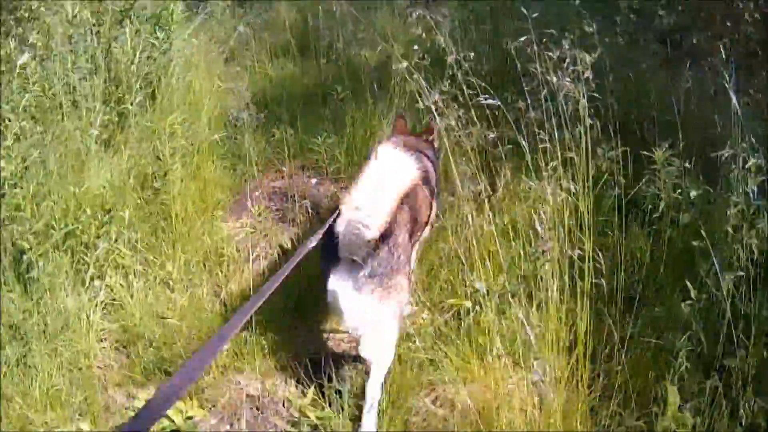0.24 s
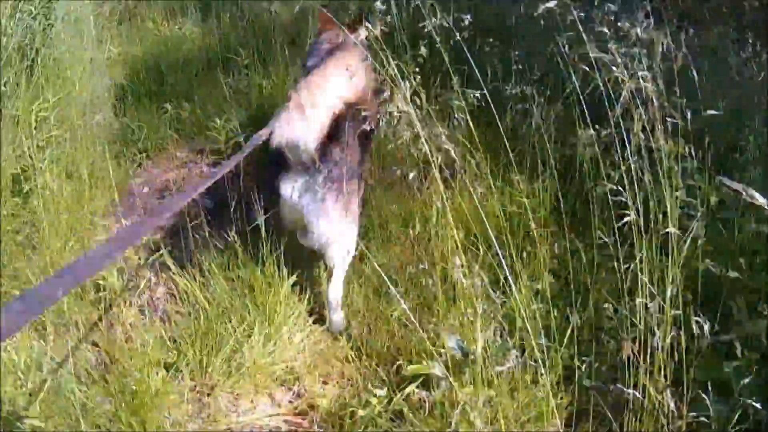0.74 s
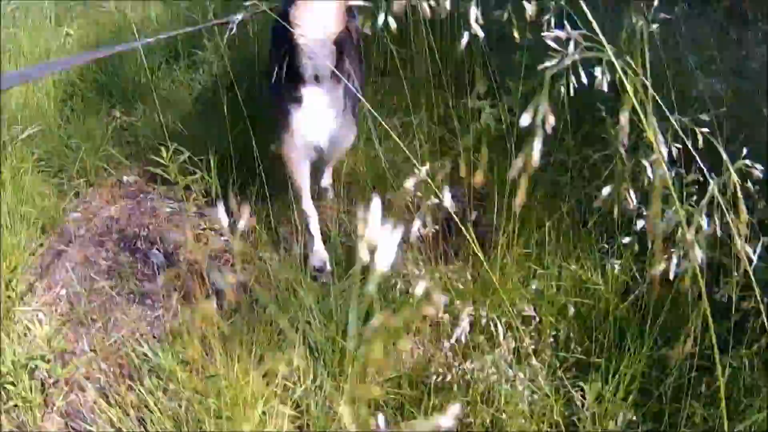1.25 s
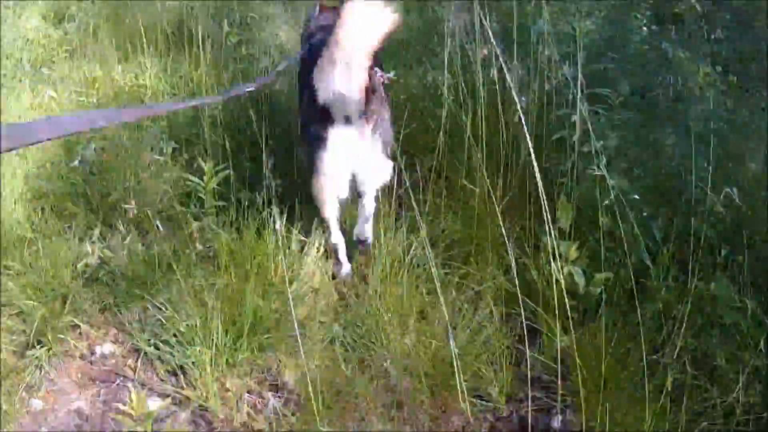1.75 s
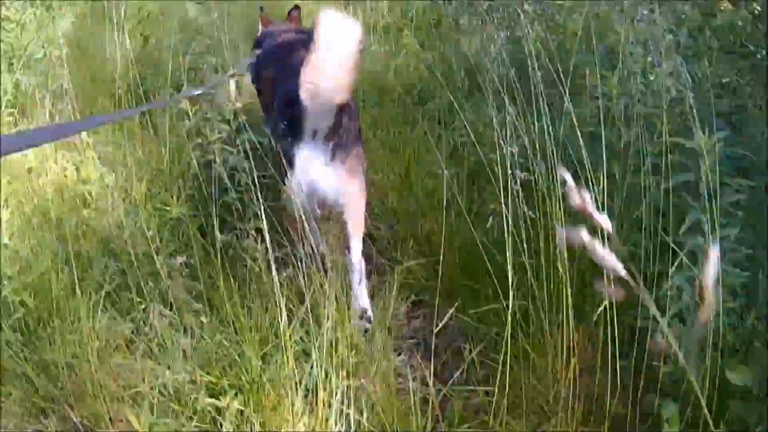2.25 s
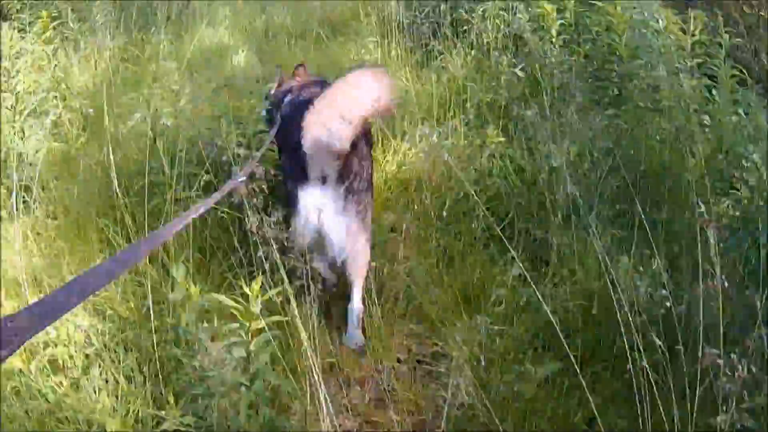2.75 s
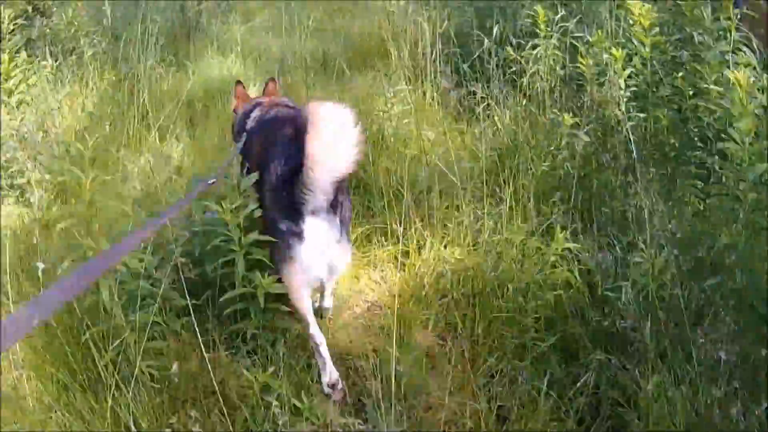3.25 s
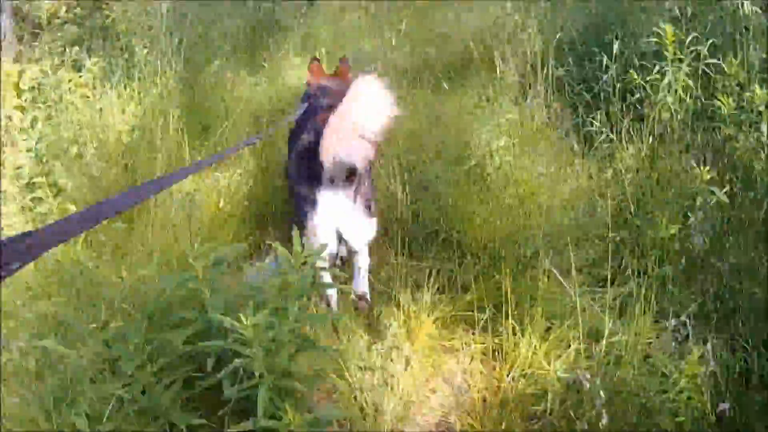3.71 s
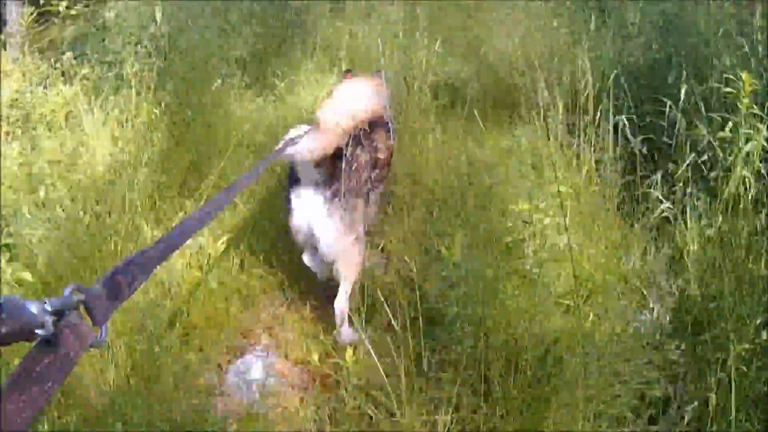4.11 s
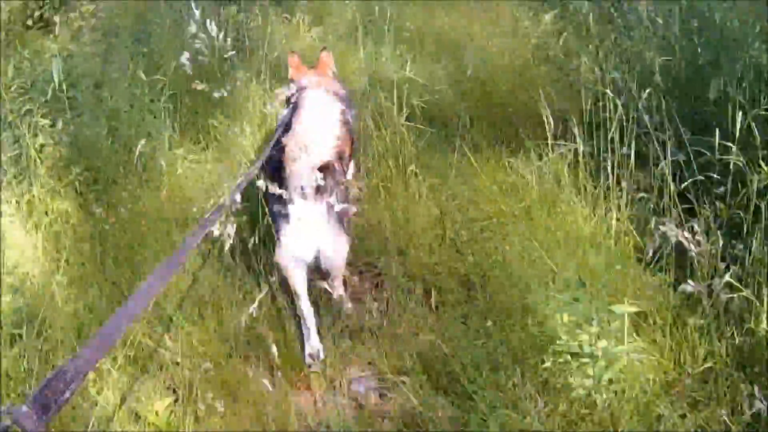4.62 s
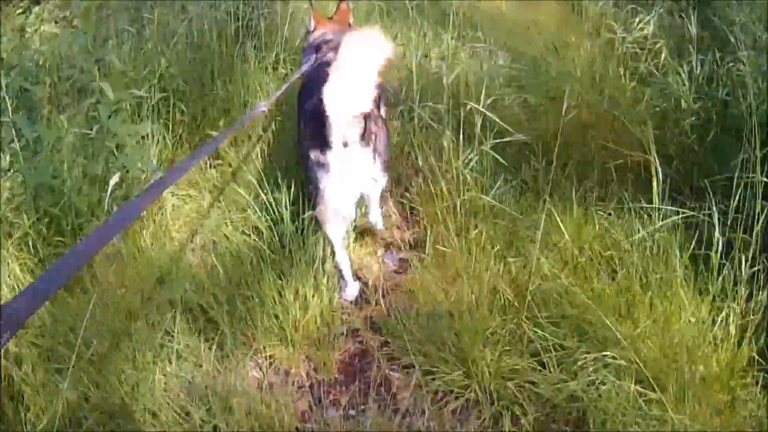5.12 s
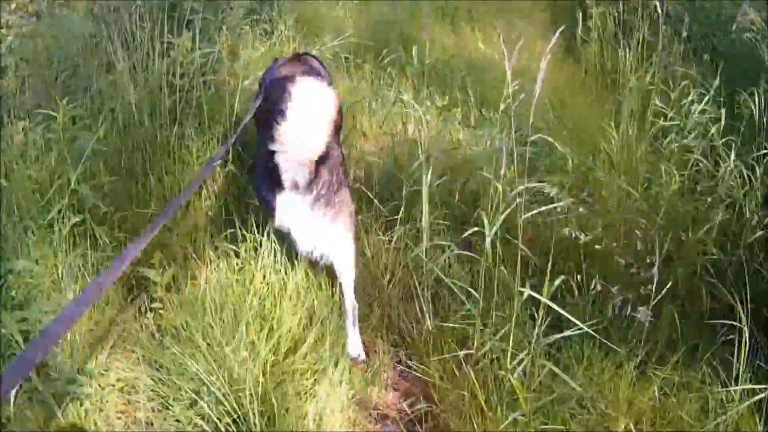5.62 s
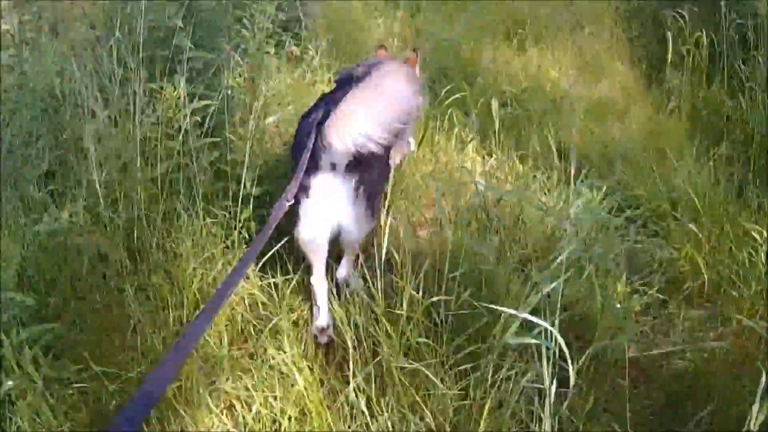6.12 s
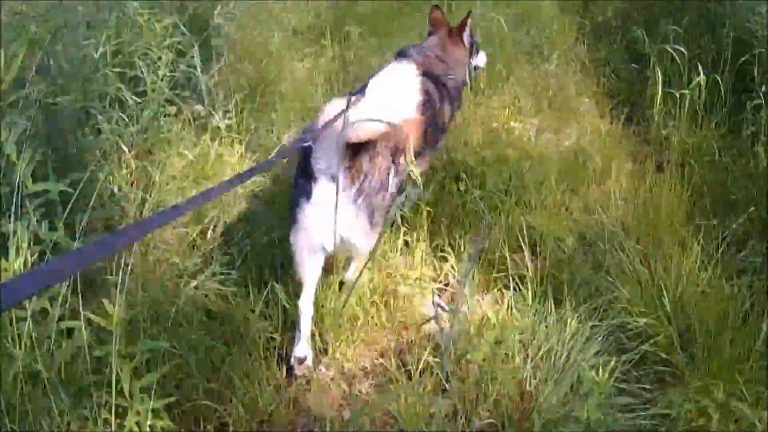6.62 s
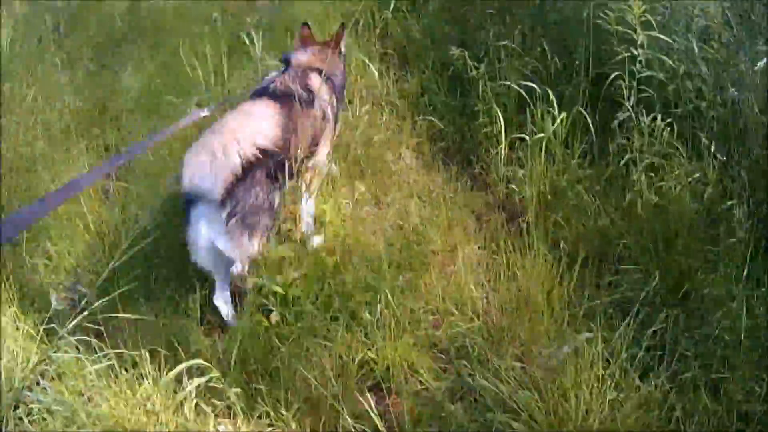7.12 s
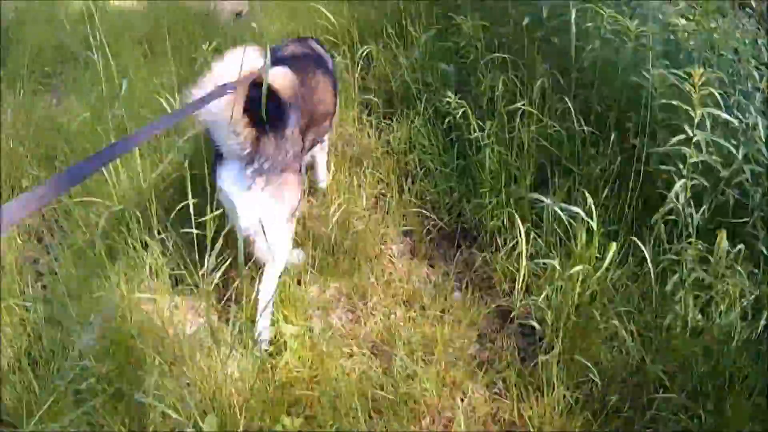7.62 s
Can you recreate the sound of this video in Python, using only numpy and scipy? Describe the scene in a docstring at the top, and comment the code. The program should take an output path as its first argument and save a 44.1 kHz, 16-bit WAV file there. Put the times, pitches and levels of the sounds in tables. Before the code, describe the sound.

A close, muffled camera microphone moves through tall grass behind a leashed dog. Uneven swishes swell and fade, full of tiny crackles, with stalks flicking in short, dull, woody clicks throughout. Soft low steps bump irregularly underneath. Midway a dry stem scrapes briefly and stops dead; near the end a low handling rumble jumps up. Faint hiss and a thin buzzing high whine stay in the background.

```python
"""A walk behind a dog through tall grass, heard by the muffled microphone of a small camera.
From the start, grass swishes past in tiny slips that ring the blades, over a low noise of the swaying
camera and its electronics: faint hiss and a whine that buzzes because its phase keeps slipping back.
Soon stalks snap in short clicks and steps bump as damped low tones; then blades slide by in grainy hiss.
Midway a dry stem scrapes in dense slips that grow and stop dead; near the end the sway rumbles louder."""
import sys
import numpy as np
from scipy import signal
from scipy.io import wavfile
from scipy.ndimage import uniform_filter1d

SR = 44100
rng = np.random.default_rng(int(sys.argv[2]) if len(sys.argv) > 2 else 0)


def wrap_up_sound(samples):
    """Save the sound to the file named by the first command line argument, as 16-bit audio."""
    columns = np.atleast_2d(samples).T
    # keep every value between -1 and 1, then stretch to whole-number steps
    tamed = np.clip(columns, -1, 1)
    steps = np.round(tamed * 32767).astype(np.int16)
    wavfile.write(sys.argv[1], SR, steps)


N = 346626
TIME = np.arange(N) / SR  # seconds

# In all colour tables below only the shape counts: the filter is scaled to unit energy.
# tufts of grass sweeping past legs and camera: [peak t/s, length/s, level/dB, brightness/(dB per octave)]
SWISH_EVENTS = [(0.006, 0.79, -42.5, 1), (0.323, 0.087, -45, -0.5), (0.838, 1, -47, 0),
                (0.873, 0.22, -40, 1.5), (1.013, 0.06, -43.5, 3.5), (1.228, 0.09, -46, 0.5),
                (1.416, 0.13, -46.5, 1.5), (1.631, 0.34, -44.5, 0.2), (1.633, 0.06, -46, 2),
                (1.836, 0.15, -47.5, 2.2), (2.034, 0.2, -42.5, 1.5), (2.234, 0.18, -43.5, 1.5),
                (2.691, 0.32, -42, 1.6), (2.872, 0.27, -44.6, 0.5), (3.09, 0.023, -51.5, 3),
                (3.192, 0.56, -49, 1.1), (3.261, 0.033, -44.5, 4.5), (3.555, 0.41, -46, 0.6),
                (3.846, 0.063, -42, 1), (4.029, 0.035, -43, 5.5), (4.05, 1, -48.5, 0.5),
                (4.379, 0.12, -45, 0.3), (4.565, 0.051, -39, 2), (4.625, 0.65, -43.0, 0.5),
                (5.097, 0.27, -48, 1.2), (5.347, 0.23, -42, 1.5), (5.567, 0.12, -48, 2),
                (5.733, 0.21, -47, 4), (5.983, 0.57, -50.5, 3), (5.983, 0.061, -41, 1),
                (6.15, 0.18, -52, 0.5), (6.389, 0.21, -47, 2), (6.485, 0.053, -40.5, 2.5),
                (6.574, 0.4, -48, -1.4), (6.915, 0.015, -42, 2.5), (7.055, 0.42, -43.5, 0.9),
                (7.224, 0.18, -47, 1), (7.644, 0.04, -44, 2), (7.645, 0.5, -48.5, 2),
                (7.87, 0.16, -47.5, 0.5)]
# a swish swells while the blades bend and dies away, duller, once they spring free
RISE_SHARE, SWISH_CURVE = 0.59, 1.27  # share of the length spent rising; bend of the fade in dB
ENDS_DB, DULLING_DB_PER_OCT = -12, 0.5  # level at both ends; loss of brightness from peak to end
# between swishes the grass underfoot keeps stirring, low and dull
STIR_DB, STIR_DB_PER_OCT = -55, -4.5
# colour of the rustle through the muffled microphone: [f/Hz, level/dB]
RUSTLE_COLOUR = [(25, -52), (65, -46.5), (140, -27.5), (250, -21), (480, -11), (680, -5.5), (880, 0),
                 (1300, -1), (1650, -11.5), (2000, -22.5), (2400, -36.5), (3100, -50.5), (5000, -72)]
# colour of the crisp edge on the rustle: [f/Hz, level/dB]
EDGE_COLOUR = [(900, -29.5), (2000, 8.5), (2600, 4), (3100, -7.5), (3650, 2.5), (4000, -10), (4500, -9.5),
               (5100, -34), (15000, -46)]
# crisp treble of the rustle at average effort: [t/s, level/dB]
TREBLE_LEVEL = [(0, -74.5), (.25, -86), (.55, -76.5), (.8, -83.5), (1.05, -88), (1.65, -81.5), (2.0, -87),
                (3.0, -81), (4.4, -85.5), (4.9, -82.5), (5.75, -90.5), (6.4, -83.5), (6.95, -83.5),
                (7.3, -84.5), (7.85, -86)]
# low rumble of the camera swaying in the hand: [t/s, level/dB]
SWAY_LEVEL = [(0, -92.5), (1.25, -81), (1.4, -93), (5, -94), (6, -89.5), (7.5, -90.5), (7.57, -72),
              (7.65, -81), (7.85, -87)]
# colour of that rumble: [f/Hz, level/dB]
RUMBLE_COLOUR = [(25, -12.5), (65, 0.5), (130, -2), (1000, -80)]
# colour of the microphone hiss: [f/Hz, level/dB]
HISS_COLOUR = [(30, 8), (300, 18), (3000, 10.5), (6000, -5), (9000, 0.5), (15000, -2.5)]
HISS_DB, WHINE_DB = -85, -86  # rms, before the camera limits the treble
WHINE_HZ, WHINE_SLIPS_PER_S = 10497.3, 89.3  # average pitch; how often the phase slips back
CUTOFF_HZ = 15720  # the camera's upper limit
# stalks that flick against legs and camera; a small shared trim is added to both levels:
# [strongest t/s, peak level/dB, centre f/Hz, crisp edge level/dB relative to the peak]
SNAP_EVENTS = [(0.3142, -35, 1270, -41), (0.4237, -35.5, 950, -43), (0.4499, -28, 970, -47),
               (0.695, -34, 1000, -40), (0.869, -24, 1200, -44), (0.876, -41, 1080, -48),
               (0.8822, -34, 1150.0, -39), (1.0122, -31.5, 990.0, -40), (1.0937, -27, 1240, -24.5),
               (1.215, -31.5, 1100, -36), (1.227, -29, 1110, -37), (1.2327, -31, 1090, -44.5),
               (1.2547, -27, 1100, -43), (1.4433, -34.5, 1050, -33), (1.5412, -32, 1120.0, -41),
               (1.6129, -26, 1020.0, -45.5), (1.635, -28, 890, -44), (1.832, -42, 1260, -17),
               (2.0142, -30, 1170, -46.5), (2.023, -26, 1110, -41), (2.04, -25, 1130, -36),
               (2.074, -30, 1110, -36), (2.224, -30, 1120, -38), (2.296, -28.5, 1140, -26.5),
               (2.8515, -30, 950.0, -39), (2.896, -28, 980, -39.5), (2.953, -32.5, 1040, -42.5),
               (2.9689, -29, 1120, -31), (3.099, -32, 1100, -46), (3.2455, -29.5, 1150.0, -49.5),
               (3.261, -29.5, 1180, -41), (3.271, -26.5, 915, -33), (3.409, -34, 1100, -48),
               (3.449, -37, 1110, -37), (3.4773, -23.5, 995, -42), (3.5753, -26, 890, -48),
               (3.8673, -29.5, 1150, -36), (4.0305, -24.5, 1020, -53.5), (4.1186, -31.5, 1110, -55),
               (4.5172, -25.5, 1000.0, -48), (4.6136, -23, 990, -59), (4.9135, -33, 1130, -22),
               (5.05, -34.5, 1080, -29), (5.142, -35, 1130, -43), (5.3174, -26.5, 984, -29),
               (5.348, -25, 985, -41), (5.52, -42, 1210, -18), (5.548, -33, 1200, -44),
               (5.803, -34.5, 1200, -33), (5.8853, -26, 873, -48), (5.9772, -35, 1030.0, -43),
               (6.0549, -31, 960, -54), (6.127, -34.5, 980, -42), (6.4817, -30, 1120.0, -42),
               (6.498, -27, 1130, -37), (6.504, -38, 1190, -26), (6.5491, -28, 1180, -42),
               (6.9042, -26.5, 1204, -25), (7.086, -30.5, 1240, -40.5), (7.2199, -28.5, 970, -49),
               (7.4472, -35.5, 990, -39), (7.583, -33.5, 1055, -37), (7.636, -28, 1060, -44),
               (7.7218, -28, 990, -48)]
# colour of a single flick, before its pitch is shifted: [f/Hz, level/dB]
FLICK_COLOUR = [(30, -56.5), (140, -37), (400, -18.5), (800, 2.5), (1100, 8), (1400, -2.5), (1800, -18.5),
                (2400, -34.5), (4000, -72.5)]
# colour of the crack of a dry stalk: [f/Hz, level/dB]
CRACK_COLOUR = [(700, -12.5), (1800, 5.5), (2400, 9), (3100, -1), (3850, -2), (4300, -18), (5200, -40.5)]
# soft bumps of steps, before a shared level trim: [strongest t/s, peak level/dB, centre f/Hz]
BUMP_EVENTS = [(0.354, -67, 141), (0.452, -53, 350), (0.877, -57.5, 192), (1.013, -42, 520.0),
               (1.543, -48, 360.0), (1.688, -51.5, 288), (2.319, -44, 400.0), (2.57, -67, 142),
               (2.885, -41, 490.0), (2.953, -46, 386), (3.573, -43, 442), (4.808, -41.5, 537),
               (5.407, -43.5, 438), (5.884, -45, 540.0), (5.957, -49.5, 380.0), (6.056, -45.5, 453),
               (6.475, -39.5, 500), (7.279, -44, 504), (7.718, -68, 142)]
# long blades sliding past with a thin hiss: [start t/s, end t/s, level at mid-slide/dB]
SLIDE_EVENTS = [(.72, .95, -95), (2.584, 3.0, -97), (6.88, 7.198, -89)]
# colour of the sliding hiss: [f/Hz, level/dB]
SHEEN_COLOUR = [(2500, -8), (3600, 1.5), (4500, 5.5), (5100, -23), (7500, -21.5), (8400, -1), (10000, -14)]
# a dry stem scrapes along, harder and harder, and slips off
SCRAPE_FROM_S, SCRAPE_TO_S, SCRAPE_DB = 3.495, 3.577, -69


def amp(db):
    """Turns decibels into a gain."""
    return 10 ** (np.asarray(db) / 20)


def unit(x):
    """Scales a sound to an rms of one."""
    return x / np.sqrt(np.mean(x ** 2) + 1e-20)


def peaked(x):
    """Scales a sound to an envelope peak of one."""
    return x / abs(signal.hilbert(x)).max()


def steadied(x, size=2205):
    """Keeps the fine grain of a sound and evens out its slow level."""
    power = uniform_filter1d(uniform_filter1d(x ** 2, size), size)
    return x / np.sqrt(abs(power) + 1e-9)


def curve(rows):
    """Joins points by straight lines in time."""
    return np.interp(TIME, *np.transpose(rows))


def wander(size):
    """Makes smooth chance of unit rms that changes over about this many samples."""
    return unit(uniform_filter1d(uniform_filter1d(rng.standard_normal(N), size), size))


def add(mix, s, sound):
    """Mixes a sound in with its strongest moment at time s."""
    start = max(round(s * SR) - np.argmax(abs(signal.hilbert(sound))), 0)
    part = mix[start:start + len(sound)]
    part += sound[:len(part)]


def ping(spectrum, shift=1, size=4096):
    """Makes a short unit-energy ring with this spectrum, shifted in pitch by a factor."""
    hz, db = np.transpose(spectrum)
    f = abs(np.fft.fftfreq(size, 1 / SR))
    log_gain = np.log(amp(np.interp(np.log(f + 1), np.log(hz * shift), db)))
    # this phase puts the energy as early as possible, with nothing before the strike
    ring = np.fft.ifft(np.exp(np.conj(signal.hilbert(log_gain)))).real[:size // 2]
    return ring / np.linalg.norm(ring)


def colour(x, spectrum, shift=1):
    """Filters a sound by a spectrum."""
    return signal.oaconvolve(x, ping(spectrum, shift))[:N]


def slips(per_s, spread_db, largest):
    """Makes random tiny impulses, many small and a few large, together at unit rms."""
    size = amp(spread_db * np.minimum(rng.exponential(1, N), largest))
    happens = rng.random(N) < per_s / SR
    return unit(size * rng.choice([-1, 1], N) * happens)


def swishing(size=64):
    """Adds the power of all swishes; brightness is averaged by power, so the loudest counts most."""
    t = TIME[::size]
    power = np.full(len(t), amp(STIR_DB) ** 2)
    bright = power * STIR_DB_PER_OCT
    for s, length, db, brightness in SWISH_EVENTS:
        # progress is -1 at the start, 0 at the peak and 1 at the end; the fade carries on beyond
        progress = (t - s) / length / np.where(t < s, RISE_SHARE, 1 - RISE_SHARE)
        swish = amp(db + ENDS_DB * abs(progress) ** SWISH_CURVE) ** 2
        power = power + swish
        bright = bright + swish * (brightness - DULLING_DB_PER_OCT * progress)
    level_db = np.interp(TIME, t, 10 * np.log10(power))
    return level_db, np.interp(TIME, t, bright / power)


def blades(ticks, lowest_hz=260, highest_hz=2500, sharpness=2.64, level_db=5, count=14):
    """Each slip rings one blade for two or three cycles: long blades low, short ones high."""
    blade = rng.integers(0, count, N)
    ringing = np.zeros(N)
    for k, hz in enumerate(np.geomspace(lowest_hz, highest_hz, count)):
        ringing += signal.lfilter(*signal.iirpeak(hz, sharpness, fs=SR), ticks * (blade == k))
    return amp(level_db) * ringing


def rustle(rub_db=-2, merge=0.15, clump_db=2.0, pivot_hz=1000, crackle_db=1, fizz_db=-3,
           crisp_follow=0.77, uneven_db=0.69, colour_wander_db=0.5):
    """Blades slip in clumps over a smooth rub, each swish with its own brightness."""
    level_db, brightness = swishing()
    noise = rng.standard_normal(N)
    clumps = amp(clump_db * unit(uniform_filter1d(uniform_filter1d(noise, size=260), size=160)))
    ticks = slips(per_s=1500, spread_db=4.5, largest=2.53) * clumps
    # in a brisk stroke the slips merge, so the smooth rub gains on them
    briskness_db = level_db - level_db.mean()
    rub = amp(rub_db + merge * briskness_db) * rng.standard_normal(N) * clumps
    body = colour(rub + blades(ticks), RUSTLE_COLOUR)
    # brightness tips the spectrum about its middle and wanders a little
    hz, t, z = signal.stft(body, SR, nperseg=512)
    octaves = np.clip(np.log2((hz + 1) / pivot_hz), -1.4, 1)[:, None]
    tilt = brightness + colour_wander_db * wander(size=1300)
    z = z * amp(octaves * np.interp(t, TIME, tilt))
    body = signal.istft(z, SR, nperseg=512)[1][:N]
    # the same slips, at random strengths, carry a crisp edge with crackle and fizz of dry seed heads
    crackle = slips(per_s=260, spread_db=4.0, largest=4.6)
    fizz = rng.standard_normal(N)
    crisp = ticks * rng.standard_normal(N) + amp(crackle_db) * crackle + amp(fizz_db) * fizz
    edge_gain = amp(curve(TREBLE_LEVEL) + crisp_follow * briskness_db)
    edge = steadied(colour(crisp, EDGE_COLOUR)) * edge_gain
    return steadied(body) * amp(level_db + uneven_db * wander(size=900)) + edge


def sway():
    """The hand that holds the camera makes a low rumble: noise with a low colour."""
    return amp(curve(SWAY_LEVEL)) * unit(colour(rng.standard_normal(N), RUMBLE_COLOUR))


def electronics(phase_slip=.46):
    """Hiss, and a high whine whose phase slips back at a steady rate, which makes it buzz."""
    # counted in cycles: the phase creeps ahead, then drops back by phase_slip
    creep = phase_slip * (TIME * WHINE_SLIPS_PER_S % 1)
    whine = np.sin(2 * np.pi * (WHINE_HZ * TIME + creep))
    hiss = colour(rng.standard_normal(N), HISS_COLOUR)
    return amp(WHINE_DB) * unit(whine) + amp(HISS_DB) * unit(hiss)


def snaps(level_db=-0.2, edge_db=2, centre_hz=1050, rebound=0.38, rebound_s=0.00242):
    """A stalk strikes with a click of two or three cycles, and touches again a moment later."""
    out = np.zeros(N)
    chances = rng.random((len(SNAP_EVENTS), 3))
    for (s, db, hz, crisp_db), (lag, force, side) in zip(SNAP_EVENTS, chances):
        flick = peaked(ping(FLICK_COLOUR, hz / centre_hz))
        crack = amp(crisp_db + edge_db) * peaked(ping(CRACK_COLOUR))
        click = (flick + crack) * amp(db + level_db) * np.sign(side - .5)
        add(out, s, click)
        # the second touch pushes the other way, with chance delay and force
        add(out, s + rebound_s * (0.836 + .7 * lag), -rebound * (.5 + force) * click)
    return out


def bumps(level_db=-3, cycles=1.6):
    """Steps knock on soft ground: low tones that swell and are quickly damped."""
    out, t = np.zeros(N), TIME[:SR // 5]
    for (s, db, hz), phase in zip(BUMP_EVENTS, rng.random(len(BUMP_EVENTS))):
        age = t * hz / cycles  # 1 when the swell is at its height
        knock = age ** 2 * np.exp(-2 * age) * np.sin(2 * np.pi * (hz * t + phase))
        add(out, s, amp(db + level_db) * peaked(knock))
    return out


def slides():
    """Each sliding blade swells and fades as a thin hiss made of tiny slips."""
    swell = np.zeros(N)
    for start, end, db in SLIDE_EVENTS:
        progress = np.clip((TIME - start) / (end - start), 0, 1)
        swell += amp(db) * np.sin(np.pi * progress)
    return swell * unit(colour(slips(per_s=660, spread_db=3.5, largest=3.0), SHEEN_COLOUR))


def scrape(growth=0.22):
    """Dense slips along a dry stem grow and stop dead."""
    progress = np.clip((TIME - SCRAPE_FROM_S) / (SCRAPE_TO_S - SCRAPE_FROM_S), 0, 1)
    force = progress ** growth * (progress < 1)
    grains = slips(per_s=4000, spread_db=2.0, largest=3.0) * force
    return amp(SCRAPE_DB) * colour(grains, CRACK_COLOUR)


def scene():
    """Mixes grass, handling, stalks and steps at one microphone."""
    return (rustle() + sway() + snaps() + bumps() + slides() + scrape())[None]


def record(dry):
    """The camera adds its own noise and cuts off the highest treble."""
    lowpass = signal.firwin(511, CUTOFF_HZ, window=("kaiser", 8), fs=SR)
    return signal.oaconvolve(dry + electronics(), lowpass[None], "same", axes=1)


dry = scene()
out = record(dry)
wrap_up_sound(out)
```